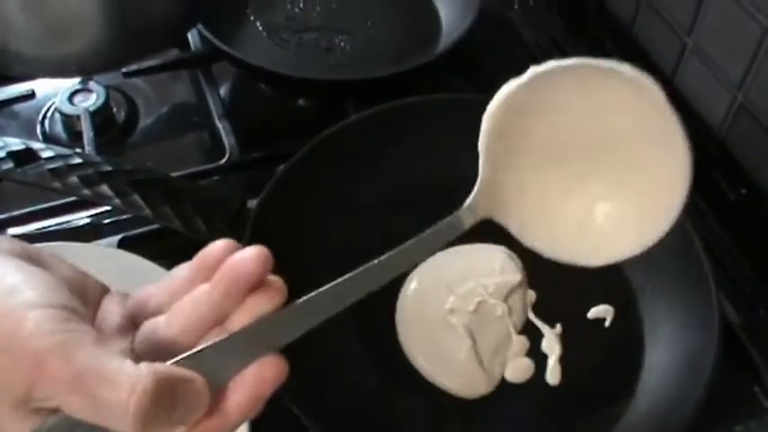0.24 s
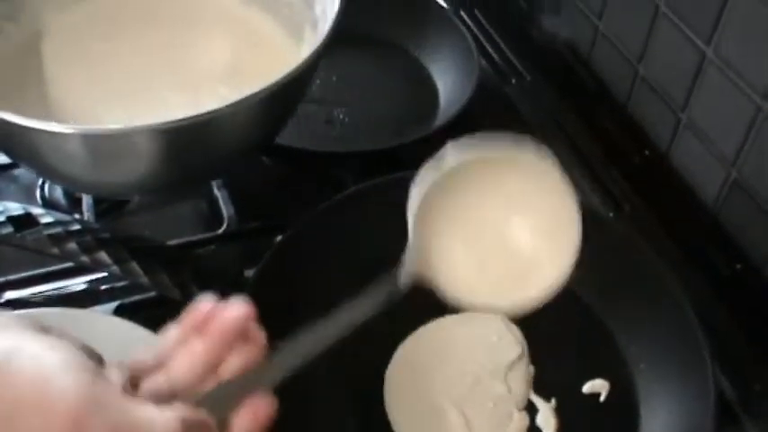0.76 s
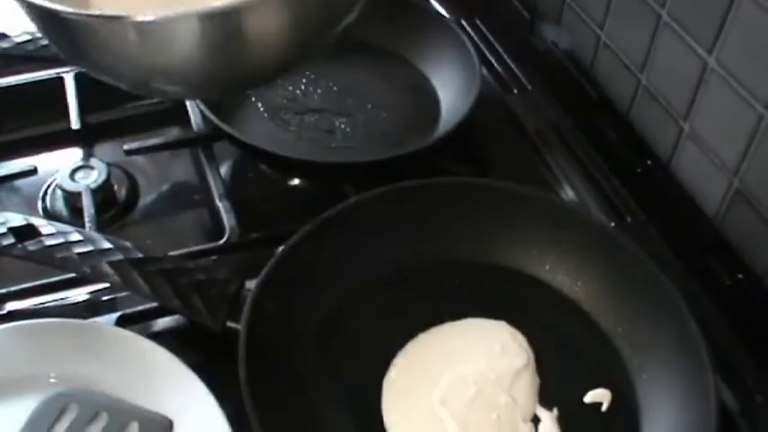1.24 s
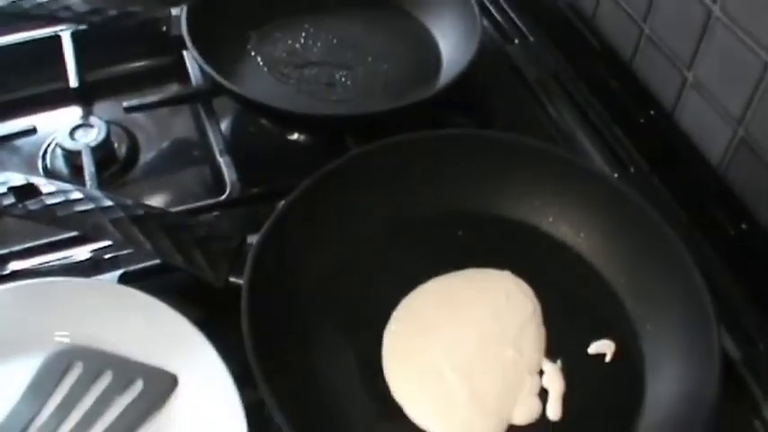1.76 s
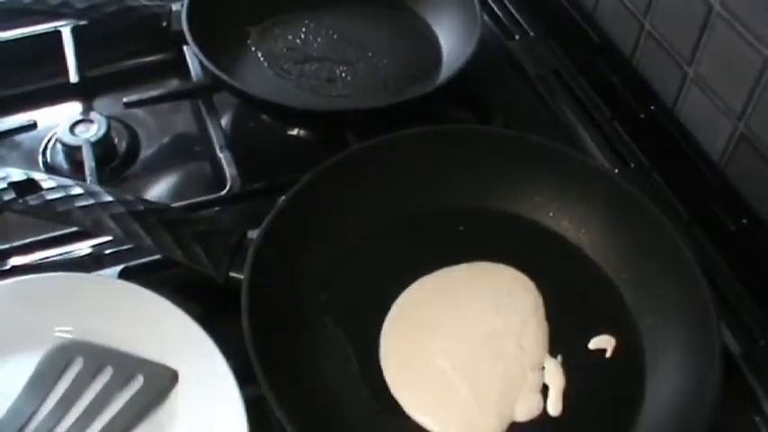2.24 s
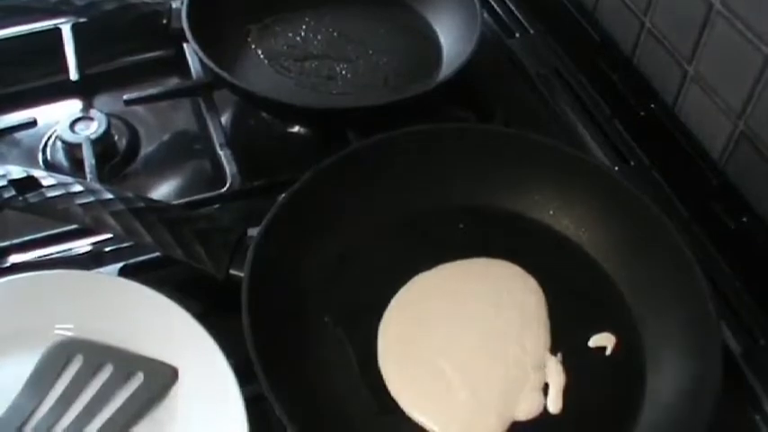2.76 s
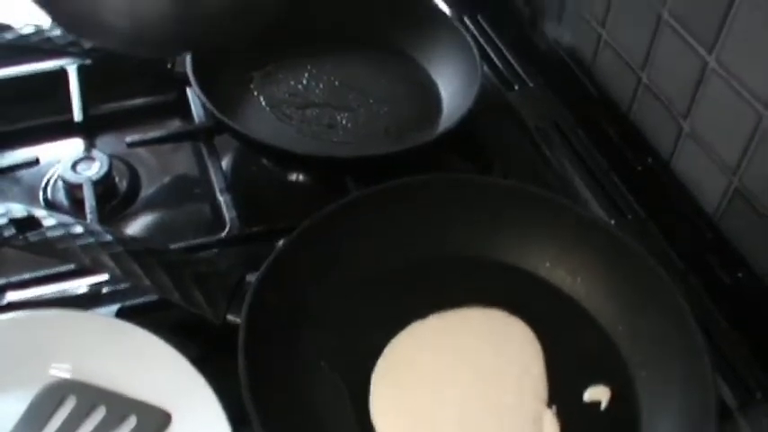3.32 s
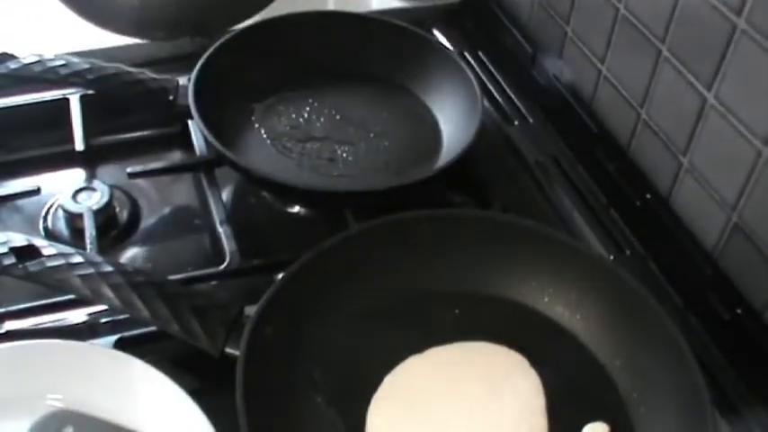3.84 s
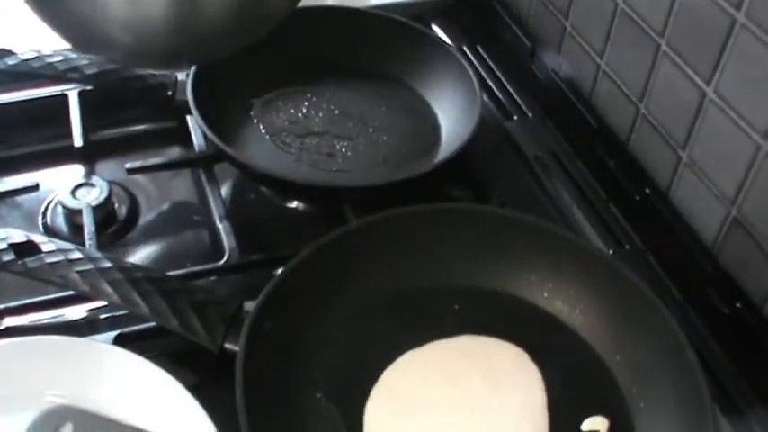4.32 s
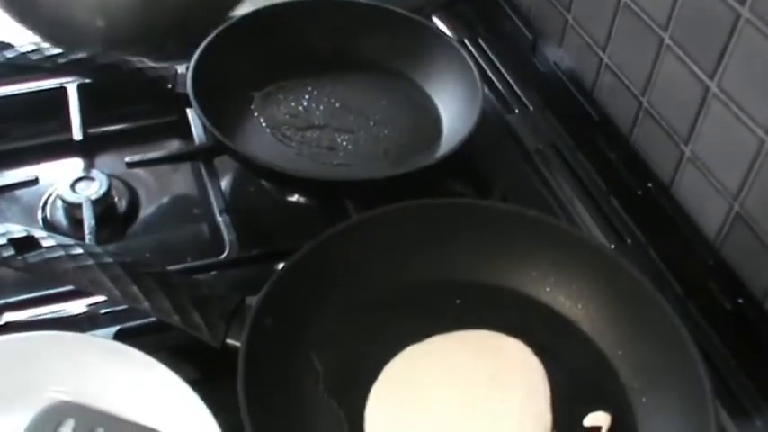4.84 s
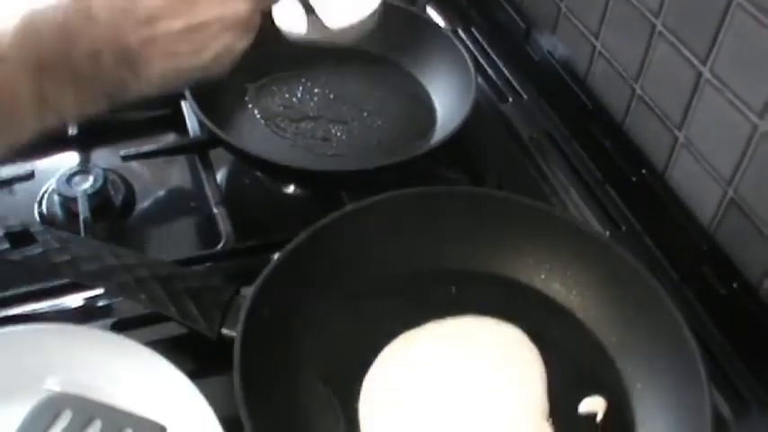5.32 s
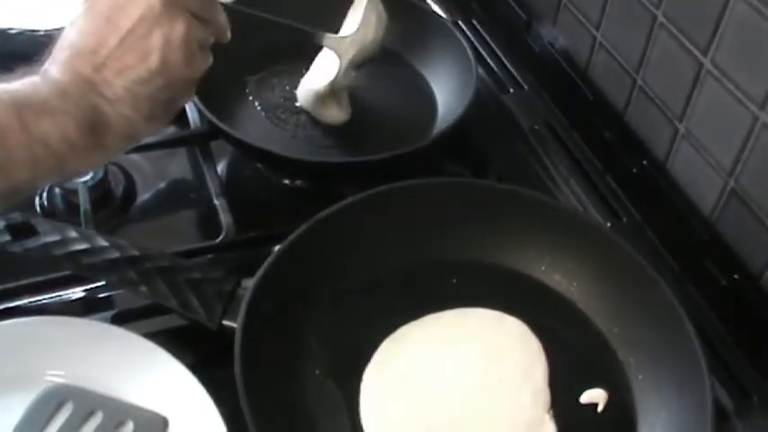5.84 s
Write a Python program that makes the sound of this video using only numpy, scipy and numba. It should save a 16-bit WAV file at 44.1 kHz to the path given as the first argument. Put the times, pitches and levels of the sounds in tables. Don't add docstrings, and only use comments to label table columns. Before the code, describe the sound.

Batter sizzles steadily in an oiled pan with sharp fat spits over a gas burner's rumble, then a squeaky metal scrape, bowl clank and dull thud.

```python
import sys
import numpy as np
from scipy import signal
from scipy.fft import rfft, irfft
from scipy.io import wavfile
from scipy.ndimage import uniform_filter1d
from numba import njit

SR = 44100
rng = np.random.default_rng(int(sys.argv[2]) if len(sys.argv) > 2 else 0)


def volts_from_decibels(level):
    exponent = np.asarray(level, float) / 20
    return 10 ** exponent


def master(y):
    cut = np.clip(np.atleast_2d(y).T, -1, 1)
    pcm = np.round(cut * 32767)
    wavfile.write(sys.argv[1], SR, pcm.astype(np.int16))


N = 268128

# (frequency [Hz], density [dB per Hz])
STEAM_SPECTRUM = [(880, -14), (1500, -13), (1610, -14.5), (2080, -12.5), (2440, -16), (4080, -10),
                  (4550, -11.5), (5380, -4.5), (6240, -7), (7690, -1), (10800, 2), (15100, -5.5),
                  (16000, -5.5)]


def level(x, db):
    return x * volts_from_decibels(db) / np.sqrt(np.mean(x ** 2))


def curve(table):
    s, *columns = np.transpose(table)
    t = np.arange(N) / SR
    return [np.interp(t, s, column, -120, -120) for column in columns]


def along(points):
    hz, db = np.transpose(points)
    grid_hz = np.fft.rfftfreq(N, 1 / SR)
    return volts_from_decibels(np.interp(np.log(grid_hz + 1), np.log(hz), db))


def colour(x, points):
    spectrum = rfft(x)
    power = np.abs(np.atleast_2d(spectrum)[0]) ** 2
    broad = np.sqrt(uniform_filter1d(power, size=3000))
    return irfft(spectrum / broad * along(points), N)


def band(x, hz, width):
    return signal.lfilter(*signal.iirpeak(hz, hz / width, SR), x)


def cut(x, hz):
    return signal.sosfilt(signal.butter(4, hz, "high", fs=SR, output="sos"), x)


def fading(x, fade_s):
    return signal.lfilter([1], [1, -np.exp(-1 / (fade_s * SR))], x)


def impulses(s, gain):
    return np.bincount((s * SR).astype(int), gain, N)


def ring(x, modes):
    out = 0
    for hz, db, t60 in modes:
        pole = np.exp(2j * np.pi * hz / SR - np.log(1000) / (min(t60, 1.) * SR))
        out = out + volts_from_decibels(db) * signal.lfilter([1], [1, -pole], x).imag
    return out


def walk(rate):
    k = int(SR / rate)
    held = np.repeat(rng.standard_normal(N // k + 1), k)
    return uniform_filter1d(held, k)[:N]


def wide():
    # (frequency [Hz], side minus mid [dB])
    spread = [(60, -14), (110, -25.5), (200, -8.5), (380, -8.5), (700, -12), (1290, -7), (2380, -29),
              (4400, -19), (8120, -10), (15000, -8)]
    mid, side = rng.standard_normal((2, N))
    return mid + irfft(rfft(side) * along(spread), N) * np.array([[1], [-1]])


def stroke(start, attack, hold, release, db, sag_db):
    s = start + np.cumsum([0, attack, hold, release])
    end_db = db + sag_db * hold
    return volts_from_decibels(curve(np.transpose([s, [db - 20, db, end_db, end_db - 30]]))[0])


@njit
def grains(s, hz, cycles, left, right):
    out = np.zeros((2, N + 4000))
    for k in range(len(s)):
        pole = np.exp((2j * np.pi - 1 / cycles[k]) * hz[k] / SR)
        i = int(s[k] * SR)
        z = pole ** (i + 1 - s[k] * SR)
        while abs(z) > .003:
            out[0, i] += left[k] * z.imag
            out[1, i] += right[k] * z.imag
            z, i = z * pole, i + 1
    return out[:, :N]


def fizz(count=40000):
    # (time [s], level [dB])
    frying = [(0.0, -30), (0.37, -34.5), (0.95, -34), (1.57, -32.5), (1.95, -33.5), (2.25, -32.5),
              (3.28, -32.5), (4.08, -33), (4.35, -33.5), (5.62, -33), (6.08, -31)]
    loudest_bubble_db = 17
    when, pitch, size, place = rng.random((count, 4)).T
    gain = volts_from_decibels(np.minimum(-3.6 * np.log(1 - size), loudest_bubble_db))
    pan = volts_from_decibels(7.0 * (2 * place - 1))
    hz = 3500 * volts_from_decibels(13 * pitch)
    pops = grains(when * N / SR, hz, np.full(count, 1.2), gain * pan, gain / pan)
    mix = level(pops, -2) + level(wide(), -4)
    surge_db = 0.27 * walk(9.7) + 0.81 * walk(45)
    return level(colour(mix, STEAM_SPECTRUM), 0) * volts_from_decibels(curve(frying)[0] + surge_db + 1.35)


def burners():
    # (frequency [Hz], density [dB per Hz])
    flame = [(12, -47), (20, -13), (130, -2), (216, -6.5), (305, -11), (474, -6), (625, 1), (844, -5.5),
             (1140, -10), (1610, -7), (2080, 3), (2440, -8), (5000, -4), (6500, -35), (11000, -120)]
    # (frequency [Hz], width [Hz], rms level [dB])
    jets = [(123.4, 66, -61.5), (627, 74, -61), (2093, 80, -54.5), (7640, 130, -46.5)]
    out = level(colour(wide(), flame), -45) * volts_from_decibels(0.87 * walk(6))
    for hz, width, db in jets:
        whistle = band(band(wide(), hz, width), hz, width)
        out += level(whistle, db) * volts_from_decibels(1.7 * walk(9))
    return out


def small_spits(count=125):
    # (time [s], peak [dB])
    lesser = [(.1801, -12.4), (.2092, -12.1), (.6035, -12.1), (.6341, -12.7), (.6681, -11.8),
              (1.0966, -11.7), (1.3017, -11.6), (1.4871, -12.7), (1.7525, -13), (1.9365, -11.6),
              (2.0291, -11.3), (2.1006, -12.5), (2.4801, -12.4), (2.8602, -11.3), (2.9562, -12),
              (3.1571, -11.9), (3.1603, -12.5), (3.716, -11.3), (4.0596, -12.5), (4.1027, -11.9),
              (4.1213, -12.6), (4.2364, -11.6), (5.5899, -12.6), (5.7907, -11.2), (5.8506, -11.9)]
    # (time [s], rate [spits per s])
    wetness = [(0, 30), (.7, 16), (2.4, 28), (3.8, 18), (4.3, 6), (5.4, 5), (5.8, 16), (6.08, 16)]
    faintest_db, mean_excess_db, loudest_db = -18, 1.3, -15.5
    pitch_hz, pitch_spread_hz = 10600, 1100
    when, size = rng.random((count, 2)).T
    due = np.cumsum(curve(wetness)[0])
    faint_s = np.searchsorted(due, when * due[-1]) / SR
    faint_db = np.minimum(faintest_db - mean_excess_db * np.log(1 - size), loudest_db)
    s, db = np.hstack([np.transpose(lesser), [faint_s, faint_db]])
    pitch, body = rng.standard_normal((len(s), 2)).T
    shift = pitch_spread_hz * np.clip(pitch, -1.5, 2)
    low_db = -21.5 - shift / 1000 + 3 * body
    return np.transpose([s, db, pitch_hz + shift, low_db])


def spits():
    # (time [s], peak [dB], bubble pitch [Hz], low part [dB])
    loud_spits = [(0.219, -10.6, 10500, -20), (0.3785, -10.2, 9400, -8), (0.5435, -4.7, 10200, -25),
                  (0.5726, -10.5, 10000, -14), (0.6962, -7.9, 9100, -13), (0.7083, -9.5, 10600, -28),
                  (0.9692, -3.8, 11200, -19), (1.1329, -10.3, 10800, -27), (1.2372, -9.6, 9800, -14),
                  (1.3513, -10.3, 11700, -21), (1.5651, -2.9, 9200, -14), (1.588, -8.2, 9100, -17),
                  (1.9233, -10.2, 8400, -12), (2.0188, -11.0, 9500, -18), (2.0553, -9.7, 11400, -18),
                  (2.1738, -7.1, 9400, -16), (2.1828, -9.0, 9800, -15), (2.2801, -6.3, 9200, -13),
                  (2.6988, -9.9, 10900, -22), (2.7862, -9.3, 11300, -23), (3.2188, -9.6, 10100, -13),
                  (3.3164, -3.2, 10100, -16), (3.4562, -9.6, 11500, -27), (3.5151, -4.7, 9500, -17),
                  (3.7269, -10.3, 11800, -24), (4.1079, -8.8, 11600, -24), (4.1339, -8.4, 9600, -17),
                  (4.2322, -9.8, 10200, -24), (4.43, -7.2, 10600, -23), (4.5389, -9.7, 12300, -25)]
    # (time [s], peak [dB], pitch [Hz], length [cycles])
    plops = [(0.3773, -15, 3640, 1.6), (.3783, -15.5, 5330, 2.3), (0.3795, -27, 1580, 2.5),
             (0.3807, -20, 2940, 2.5), (0.667, -27, 3680, 5.0), (1.2372, -22.5, 3830, 1.4),
             (1.4648, -18, 5500, 3.4), (1.5892, -28, 1820, 2.8), (4.1027, -19.5, 6050, 4.0)]
    echo_s, echo_db = .00042, -11
    splash_s, splash_db, splash_growth = .006, -30.5, .3
    s, db, hz, low_db = np.vstack([loud_spits, small_spits()]).T
    place, wall = rng.standard_normal((len(s), 2)).T
    pan_db = -2 + 2.5 * place
    db = db + 8.3
    left, right, one = -volts_from_decibels(db + pan_db / 2), -volts_from_decibels(db - pan_db / 2), np.ones(len(s))

    cycles = .65 - .035 * np.minimum(db, 0)
    crack = grains(s - 1 / hz, 1.12 * hz, cycles, left, right)
    crack += volts_from_decibels(echo_db) * grains(s + echo_s * volts_from_decibels(2.5 * wall), hz, one, left, right)
    body = volts_from_decibels(low_db - 3.5)
    low = grains(s - 1 / hz, 4000 * one, 1.12 * one, left * body, right * body)

    start = impulses(s, volts_from_decibels((1 + splash_growth) * db + splash_db))
    droplets = level(colour(wide(), STEAM_SPECTRUM), 0) * volts_from_decibels(3 * walk(600))
    splash = fading(start, splash_s) * droplets

    s, db, hz, cycles = np.transpose(plops)
    wet = grains(s, hz, cycles, volts_from_decibels(db), volts_from_decibels(db))
    return cut(crack, 5200) + cut(low, 2340) + splash + cut(wet, 480)


def struck_wood(table, modes):
    force, shake = np.zeros((2, N))
    for s, db, ms, rumble_db in table:
        push = np.hanning(int(ms * SR / 1000) + 3)
        force[int(s * SR):][:len(push)] += volts_from_decibels(db) * push / push.sum()
        shake[int(s * SR)] += volts_from_decibels(rumble_db)
    rumble = band(band(wide(), 250, 560), 290, 800)
    return cut(fading(shake, 0.046) * level(rumble, 0) - ring(force, modes), 70)


def cupboard_taps():
    # (time [s], peak [dB], push length [ms], rumble [dB])
    taps = [(1.358, -34, 2.3, -43.5), (1.378, -43, 1.7, -51), (4.630, -35, 0.71, -46),
            (4.643, -35.5, .8, -54), (2.683, -44, 0.91, -51), (4.945, -41, 0.94, -49)]
    # (frequency [Hz], level [dB], t60 [s])
    panel = [(151, -10, 0.075), (278, -14, 0.047), (367, -3.5, 0.052), (503, -7, 0.081), (808, -3, .07),
             (1104, 2.5, .08)]
    return struck_wood(taps, panel)


def scrape():
    # (time [s], squeak level [dB])
    dragging = [(2.33, -41), (2.392, -26.5), (2.412, -23), (2.452, -25), (2.474, -31), (2.578, -26.5),
                (2.594, -30), (2.658, -39), (2.7, -52)]
    # (time [s], peak [dB])
    rim_catches = [(2.3675, -36), (2.3835, -29), (2.406, -23), (2.4084, -33), (2.445, -29), (2.4614, -33),
                   (2.4853, -25), (2.4967, -24), (2.5254, -31), (2.5416, -30), (2.565, -21), (2.604, -23),
                   (2.621, -22), (2.6514, -22)]
    # (time [s], pitch [ratio])
    pitch_sag = [(2.33, 1.06), (2.42, 1), (2.5, 1.0), (2.7, .98)]
    # (frequency [Hz], width [Hz], level [dB])
    bowl_lines = [(530, 10.4, -7), (943, 26, -9.5), (1120, 22, -11), (1305, 40, -6), (1693, 22.6, 1.5),
                  (2070, 55, -4.5), (2554, 87, -5.5), (2940, 48, -12), (3240, 21, -10)]
    # (start [s], attack [s], hold [s], release [s], level [dB], sag [dB per s])
    rub = (2.33, .06, .21, .08, -33.5, -5)
    lowest = (2.4, .07, .15, .08, -36, 0)
    s, db = np.transpose(rim_catches)
    grip = .45 + np.convolve(impulses(s, volts_from_decibels(db + 19)), np.hanning(700))[:N]
    drag = volts_from_decibels(curve(dragging)[0])
    elapsed = np.clip(np.arange(N) / SR - dragging[1][0], 0, 1)
    upper = drag * volts_from_decibels(-3 - 21 * elapsed)
    lower = stroke(*lowest)
    turns = np.cumsum(curve(pitch_sag)[0]) / SR
    steel = upper * level(band(wide(), 2800, 1800), -9.0)
    for hz, width, line_db in bowl_lines:
        wander = np.cumsum(rng.standard_normal(N)) * np.sqrt(2 * np.pi * width / SR)
        if hz < 1000:
            share = lower
        elif 1200 < hz < 1900:
            share = drag
        else:
            share = upper
        if not 1500 < hz < 1900:
            share = share * volts_from_decibels(2.5 * walk(40))
        steel += volts_from_decibels(line_db) * share * np.sin(2 * np.pi * hz * turns + wander)
    grit = level(band(cut(wide(), 4900), 6300, 2000), -3.7)
    return steel * grip + stroke(*rub) * volts_from_decibels(1.5 * walk(60)) * grit


def knock():
    # (time [s], peak [dB])
    landings = [
        (3.8601, -7.5),
        (3.865, -7),
        (3.871, -29),
        (3.887, -18),
        (3.921, -18.5),
    ]
    # (frequency [Hz], level [dB], t60 [s])
    bowl_modes = [(213, -18, 0.12), (376, -23, 0.28), (532, -7, 0.18), (972, -15.5, 0.44), (1130, -20, 0.3),
                  (1156, -2.5, 0.18), (1225, -11, .1), (1670, -10.5, 0.26), (2158, 5, 0.2),
                  (2586, -1, 0.065), (2980, 2, 0.049), (3160, -21, .08), (3800, -22, 0.047),
                  (5420, -8, 0.05)]
    # (hold [s], release [s], level [dB], sag [dB per s])
    main_slide = (.15, .14, -28.5, -50)
    # (frequency [Hz], width [Hz], hold [s], release [s], level [dB], sag [dB per s])
    slide_voices = [
        (6300, 900, .1, .2, -44, 60),
        (1150, 850, .16, .12, -32, 0),
        (430, 480, .15, .12, -27.5, -125),
    ]
    slide_s, attack_s = 3.866, 0.0063
    s, db = np.transpose(landings)
    blows = impulses(s, volts_from_decibels(db))
    crack = fading(blows, 0.0036) * band(wide(), 1840, 1900)
    grit = wide() * volts_from_decibels(1.5 * walk(440))
    ringing = level(cut(ring(grit, bowl_modes), 1880), -6.0)
    rubbing = level(band(cut(grit, 1800), 2300, 1700), -1.4)
    slide = (ringing + rubbing) * stroke(slide_s, attack_s, *main_slide)
    for hz, width, *shape in slide_voices:
        voice = level(band(band(grit, hz, width), hz, width), -1.3)
        slide += stroke(slide_s, attack_s, *shape) * voice
    return volts_from_decibels(-13.5) * ring(blows, bowl_modes) + volts_from_decibels(-1.5) * crack + slide


def worktop_thuds():
    # (time [s], peak [dB], push length [ms], rumble [dB])
    thuds = [
        (5.4165, -18.5, 1.75, -40.5),
        (5.4222, -32, 0.81, -42),
    ]
    # (frequency [Hz], level [dB], t60 [s])
    worktop = [(133.7, -4, 0.21), (246, -7, 0.043), (334, -3, 0.062), (526, -13, 0.072), (830, -22, 0.054),
               (1100, -3, 0.067), (1250, 2, 0.046)]
    return struck_wood(thuds, worktop)


def room(near):
    t60_s, room_db = 0.3, -11
    t = np.arange(SR // 2) / SR
    decay = np.exp(-np.log(1000) * t / t60_s) * (t > .002)
    tail = rng.standard_normal((2, len(t))) * decay
    tail = tail / np.sqrt(np.sum(tail ** 2) / 2)
    return volts_from_decibels(room_db) * signal.fftconvolve(near, tail, axes=1)[:, :N]


def scene():
    near = spits() + volts_from_decibels(np.array([[.7], [-.7]])) * scrape() + knock()
    pan = volts_from_decibels(np.array([[-.5], [.5]])) * fizz()
    wood = cupboard_taps() + worktop_thuds()
    return cut(near + room(near), 114) + pan + burners() + wood


def top_cut(x):
    return signal.sosfilt(signal.butter(12, 17020, fs=SR, output="sos"), x)


def record(dry):
    top = signal.ellip(14, .3, 90, 15740, fs=SR, output="sos")
    return top_cut(signal.sosfilt(top, dry))


dry = scene()
out = record(dry)
master(out)
```